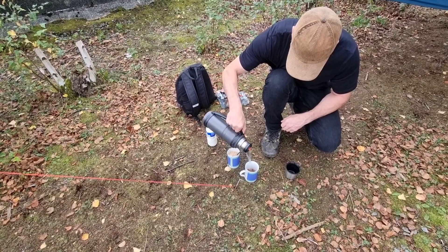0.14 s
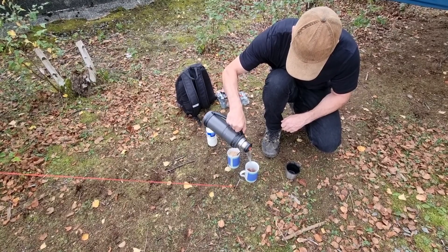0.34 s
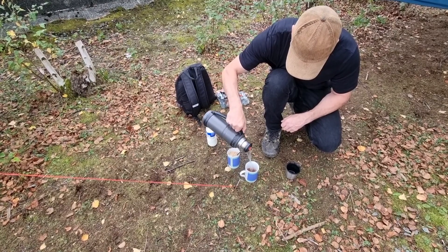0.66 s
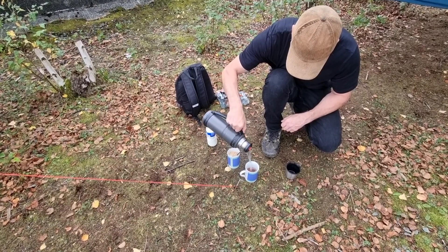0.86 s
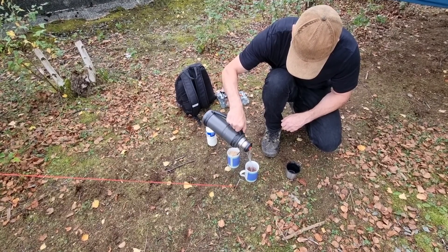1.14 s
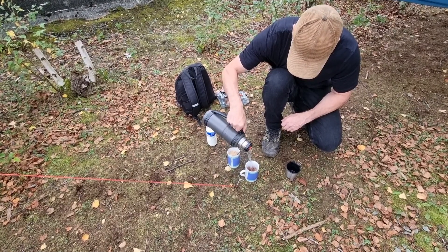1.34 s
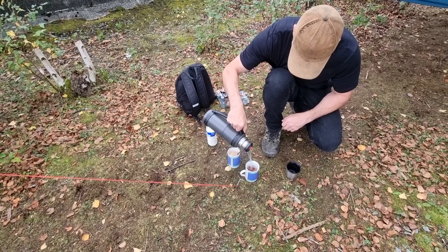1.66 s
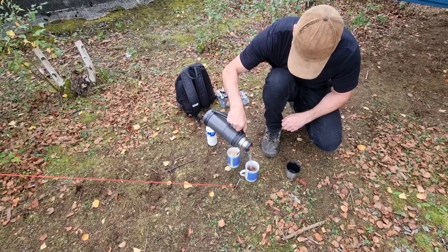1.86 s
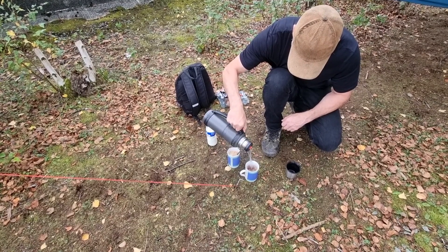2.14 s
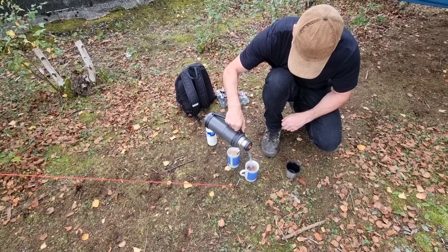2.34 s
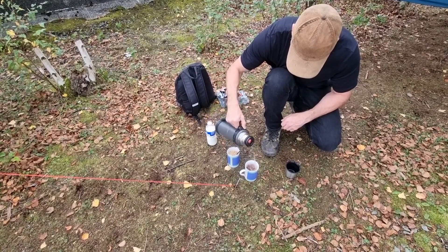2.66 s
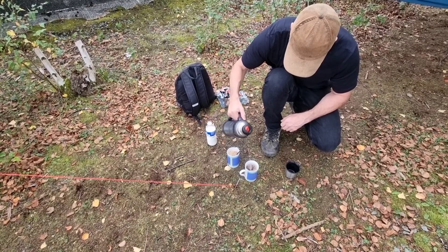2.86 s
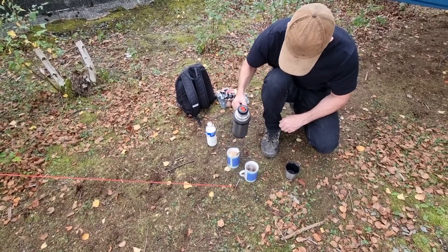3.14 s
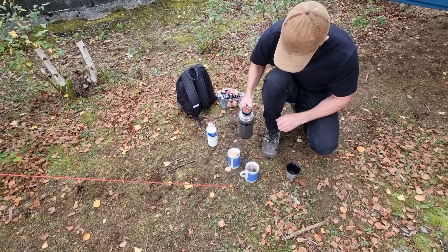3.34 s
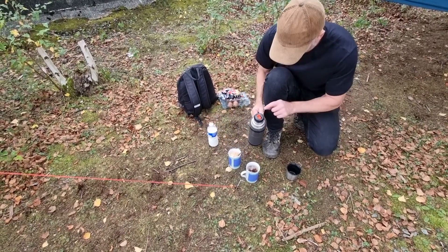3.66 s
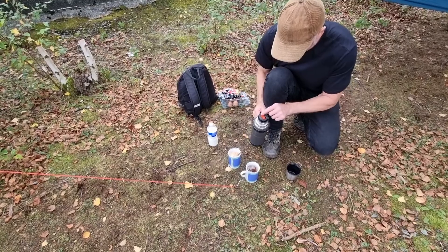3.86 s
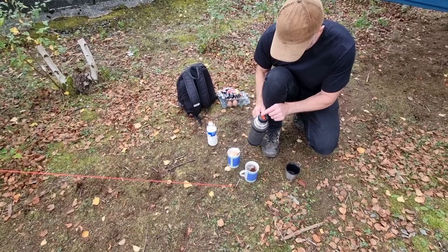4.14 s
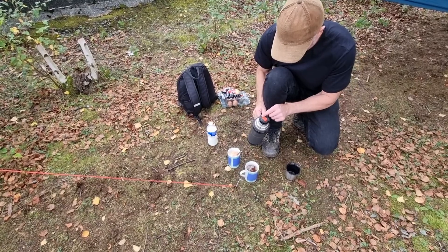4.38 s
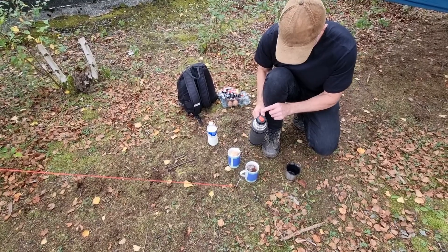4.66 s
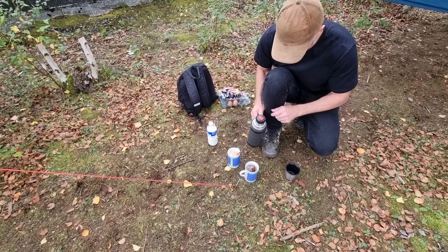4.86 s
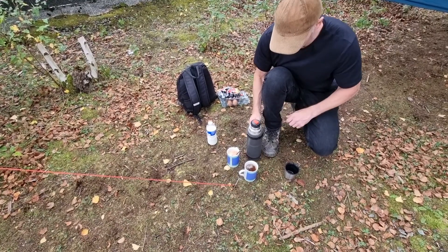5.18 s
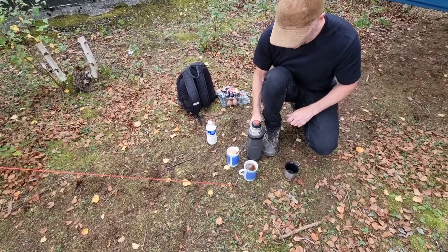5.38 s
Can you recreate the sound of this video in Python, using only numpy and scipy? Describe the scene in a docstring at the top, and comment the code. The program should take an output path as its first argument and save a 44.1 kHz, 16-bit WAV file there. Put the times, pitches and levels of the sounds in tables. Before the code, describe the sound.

Close and left of centre, a hot drink pours from a steel flask into a mug, bubbling and plopping, its hollow tone rising as the mug fills. Pouring thins to drips and ends at three seconds. After a quiet gap the stopper clicks shut, far louder than anything else, followed by small light ticks. Distant low rumble and wash continue outdoors.

```python
"""From the start a hot drink is poured from a steel flask into a mug outdoors: random splashes ring the mug's
air column, which rises in pitch as it fills, while bubbles pop as swelling tones and droplets tick; it ends at 3 s.
From 1.8 to 4.4 s the left treble is raised. One small handling tick comes at 3.66 s; at 4.3 s the stopper clicks
shut: noise cracks and a modal ring; the other ticks follow from 4.86 s. Throughout: distant noise bands (rumble,
wash, drone) and hiss; faint whistles now and then. The flask stands left of a close pair; sparse taps echo it all."""
import sys
import numpy as np
from scipy import signal
from scipy.fft import rfft, irfft
from scipy.io import wavfile
from scipy.ndimage import uniform_filter1d

SR = 44100
rng = np.random.default_rng(int(sys.argv[2]) if len(sys.argv) > 2 else 0)


def store_wav(level_fs):
    """Save 16-bit WAV to argv[1]."""
    pcm = np.round(np.clip(np.atleast_2d(level_fs), -1, 1) * 32767)
    wavfile.write(sys.argv[1], SR, pcm.T.astype(np.int16))


N = 243359

# popping bubbles, each with a small bright one; levels relative:
# t/s, level/dB, f/Hz, bright level/dB, bright f/Hz, kick to the second ring/dB
BUBBLES = [(0.0124, -39, 1116, -75, 2390, -72), (0.0272, -34.5, 1230, -64, 2850, -65),
           (0.0478, -34, 1170, -65, 2680, -62), (0.063, -32.5, 1120, -48.5, 3200, -68),
           (0.0872, -44, 1130, -49, 3260, -65), (0.132, -46, 1270, -52, 3040, -64),
           (0.163, -47, 1210, -58, 3180, -58), (0.1768, -34.5, 1247, -53, 3300, -60),
           (0.212, -44, 1175, -50, 2780, -59), (0.2258, -30, 1204, -45, 2950, -61),
           (0.281, -39.5, 1173, -51, 3270, -68), (0.294, -46, 1240, -45, 3220, -62),
           (0.3153, -42, 1180, -52, 3300, -61), (0.3523, -41.5, 1200, -78, 2690, -66),
           (0.382, -39.5, 1155, -74, 2620, -68), (0.406, -53, 1380, -44.5, 3270, -57),
           (0.4114, -29, 1227, -48, 2750, -56), (0.42, -31.5, 1370, -44, 3250, -56),
           (0.4408, -36.5, 1190, -63, 2300, -67), (0.4898, -33.5, 1190, -68, 2780, -67),
           (0.501, -59, 1260, -46, 3200, -63), (0.5227, -45, 1270, -54, 3250, -65),
           (0.5466, -41, 1170, -57, 3180, -63), (0.5835, -40, 1160, -63, 3050, -55),
           (0.6045, -30, 1270, -52.5, 3100, -52), (0.6112, -34, 1325, -45, 3030, -59),
           (0.6414, -35, 1270, -48.5, 3280, -58), (0.6935, -44, 1185, -80, 2840, -64),
           (0.7088, -28, 1267, -79, 2760, -66), (0.7512, -34.5, 1310, -63, 3350, -57),
           (0.817, -38.5, 1245, -53.5, 3120, -60), (0.84, -34.5, 1192, -58, 2900, -59),
           (0.8706, -34, 1295, -61, 2710, -60), (0.8968, -40.5, 1250, -75, 2740, -60),
           (0.9157, -39, 1315, -82, 2730, -58), (0.936, -45, 1300, -72, 2320, -53),
           (0.9652, -38, 1400, -71, 2880, -51), (0.998, -45, 1280, -79, 2900, -57),
           (1.011, -40.5, 1450, -62, 2830, -56), (1.0568, -40.5, 1390, -66, 3080, -57),
           (1.0873, -49, 1240, -64, 2900, -62), (1.1324, -30, 1220, -51, 2770, -51),
           (1.1441, -30.5, 1324, -57, 2760, -53), (1.1699, -40, 1400, -62, 2340, -58),
           (1.1827, -45, 1150, -52.5, 3170, -60), (1.2366, -40, 1510, -61, 2700, -58),
           (1.255, -52, 1110, -50, 2980, -55), (1.308, -44.5, 1310, -62, 2920, -52),
           (1.3353, -41, 1570, -49, 2200, -50), (1.3623, -39, 1420, -48.5, 3100, -51),
           (1.425, -40.5, 1320, -74, 2860, -55), (1.441, -46, 1330, -67, 2800, -50),
           (1.481, -42.5, 1310, -55, 2650, -51), (1.5126, -51, 1560, -55, 3250, -54),
           (1.5458, -49, 1750, -52, 2870, -55), (1.6033, -33.5, 1380, -72, 2360, -50),
           (1.6344, -38.5, 1280, -76, 2820, -47), (1.6531, -37, 1690, -70, 2340, -47),
           (1.6939, -41, 1370, -44, 2980, -54), (1.7285, -46, 1800, -55, 2680, -53),
           (1.7445, -44, 1160, -46.5, 2700, -53), (1.7913, -55, 1290, -54, 3070, -58),
           (1.831, -57, 1750, -54, 2700, -58), (1.914, -52, 1750, -63, 2740, -54),
           (1.9514, -51.5, 1670, -67, 2950, -57), (2.0188, -44.5, 1610, -59, 3040, -54),
           (2.0595, -50, 1730, -65, 2370, -56), (2.0824, -57, 1850, -57, 2710, -55),
           (2.0957, -49, 1790, -47, 2670, -56), (2.158, -52, 1190, -53, 2300, -56),
           (2.174, -49, 1770, -52, 2670, -53), (2.2034, -36.5, 1580, -53, 3070, -47),
           (2.2347, -41.5, 1336, -41, 2940, -53), (2.2662, -69, 1600, -57, 3060, -58),
           (2.284, -64, 1970, -53, 2860, -56), (2.4528, -49, 1670, -57, 2860, -57),
           (2.4776, -50.5, 1200, -58, 2730, -65), (2.5515, -48.5, 1270, -52, 3130, -45),
           (2.5659, -46, 1930, -45.5, 2840, -49), (2.6242, -39, 1700, -49.5, 3200, -46),
           (2.6598, -46.5, 1750, -53, 2930, -56), (2.698, -50, 1830, -52, 2870, -58),
           (2.7288, -53, 1220, -48, 2820, -57), (2.7608, -50.5, 1180, -55, 2600, -62),
           (2.8402, -55, 1160, -52.5, 2210, -58)]


def amp(db):
    """Decibels to gain."""
    return 10 ** (np.asarray(db) / 20)


def evened(x):
    """Scales to rms 1."""
    return x / np.sqrt(np.mean(x ** 2) + 1e-20)


def read(points, hz):
    """Interpolates a spectrum table on a log-frequency axis."""
    f, value = np.transpose(points)
    return np.interp(np.log(hz + 1), np.log(f + 1), value)


def curve(rows, t, axis):
    """Interpolates one column of a time table."""
    rows = np.array(rows)
    return np.interp(t, rows[:, 0], rows[:, axis])


def add(mix, s, sound):
    """Mixes a sound in at s seconds."""
    part = mix[round(s * SR):][:len(sound)]
    part += sound[:len(part)]


def resonate(x, hz, width):
    """One-pole resonance: shifts hz (may vary) down to zero, smooths, shifts back."""
    turn = np.exp(2j * np.pi * np.cumsum(hz * np.ones(len(x))) / SR)
    r = np.exp(-np.pi * width / SR)
    return 2 * (turn * signal.lfilter([1 - r], [1, -r], x / turn)).real


def twice(x, hz, width):
    """Two equal resonances in series, for steeper skirts; peak gain near 1."""
    return resonate(resonate(x, hz, width), hz, width)


def narrow(x, hz, width):
    """Steep resonance scaled to rms 1."""
    return evened(twice(x, hz, width))


def drift(seconds):
    """Slow random curve of rms 1: noise averaged twice."""
    n = round(seconds * SR)
    return evened(uniform_filter1d(uniform_filter1d(rng.standard_normal(N), n), n))


def colour(points):
    """Minimum-phase filter taps with the given dB spectrum."""
    hz = abs(np.fft.fftfreq(4096, 1 / SR))
    log_gain = np.log(amp(np.maximum(read(points, hz), -100)))
    return np.fft.ifft(np.exp(log_gain - 1j * signal.hilbert(log_gain).imag)).real[:2048]


def ping(db, hz, t60, glide, rise):
    """Decaying sine with a rounded start; glide raises its pitch."""
    t = np.arange(2600) / SR
    t60 = max(t60, .003)
    envelope = amp(db - 60 * t / t60) * (1 - np.exp(-t / rise)) ** 2
    return envelope * np.sin(2 * np.pi * hz * t * (1 + glide * t))


def bubble(db, hz, length, glide):
    """A few cycles that swell to db at length seconds and die, rising in pitch."""
    t = np.arange(1800) / SR
    u = t / max(length, .0004)
    swell = (u * np.exp(1 - u)) ** 1.4
    return amp(db) * swell * np.sin(2 * np.pi * hz * t * (1 + glide * t))


def noise(points, leaning, patchy_db):
    """Two-channel noise, rms 1, level drifting in patches over time and frequency."""
    # f/Hz, left-right likeness (1 = same)
    likeness = [(60, 0.82), (130, 1), (290, 0.58), (640, 0.13), (1410, -0.4), (3100, -0.19), (6820, 0.63),
                (15000, 1)]
    hz = np.fft.rfftfreq(2048, 1 / SR)
    a, b, c, d, patches = rng.standard_normal((N // 512 + 5, 1025, 5)).T
    patches = evened(uniform_filter1d(uniform_filter1d(patches, 12, 0), 8, 1))
    same = np.clip(read(likeness, hz), -1, 1)[:, None]
    left = a + 1j * b
    right = same * left + np.sqrt(1 - same ** 2) * (c + 1j * d)
    half_lean_db = read(leaning, hz)[:, None] / 2
    shape_db = read(points, hz)[:, None] + patchy_db * patches
    z = np.array([left, right]) * amp(shape_db + np.array([half_lean_db, -half_lean_db]))
    return evened(signal.istft(z, nperseg=2048, noverlap=1536)[1][:, :N])


def outdoors():
    """Distant rumble, wash and fuzzy drone, plus hiss: shaped noise under level curves."""
    # distant sounds: t/s, wash level/dB, drone level/dB
    far = [(0, -52.5, -67), (.75, -53.5, -61.5), (1.49, -53, -53), (2.2, -56, -60.5), (2.6, -55, -85),
           (3.6, -54.5, -80), (4.0, -54, -52), (4.3, -53, -69), (4.6, -50, -59.5), (5.04, -51, -46),
           (5.52, -51, -55)]
    # noise spectra: f/Hz, relative density/dB per Hz
    rumble_shape = [(12, -60.5), (20, -36.5), (30, -38), (59, 9), (82, 2), (113, -11.5), (200, -15),
                    (260, -39), (440, -120)]
    wash_shape = [(59, -49.5), (100, -3), (298, -5), (367, -9), (505, -9), (1070, -17.5), (1320, -18),
                  (1480, -23.5), (1780, -25.5), (3580, -38), (9000, -64), (11700, -100.5), (19800, -120)]
    # microphone hiss: f/Hz, relative density/dB per Hz
    hiss_shape = [(4120, -25.5), (7000, -10.5), (7480, -19), (10600, -1.5), (11800, 1), (13800, 7.5),
                  (16000, -9)]
    # far sounds: f/Hz, left minus right/dB
    far_lean = [(60, -2), (180, 0), (550, 1.5), (1650, 1.5), (4970, 12), (15000, -11)]
    # hiss: f/Hz, left minus right/dB
    hiss_lean = [(60, 0.5), (130, -0.5), (290, 0), (640, -1), (1410, 7), (3100, 5), (6820, 6.5),
                 (15000, -7.5)]
    start_db, fade_db_per_s, swell_db, hiss_db = -48, 0.54, -4, -87
    drone_hz, drone_width_hz = 293, 130
    t = np.arange(N) / SR
    rumble_db = start_db - fade_db_per_s * t + swell_db * drift(0.037)
    rumble = amp(rumble_db) * noise(rumble_shape, far_lean, patchy_db=0)
    wash = amp(curve(far, t, axis=1)) * noise(wash_shape, far_lean, patchy_db=1.5)
    drone = amp(curve(far, t, axis=2)) * narrow(rng.standard_normal(N), drone_hz, drone_width_hz)
    return rumble + wash + drone + amp(hiss_db) * noise(hiss_shape, hiss_lean, patchy_db=0)


def whistles():
    """Faint whistles: narrow noise bands faded in and out."""
    # start/s, end/s, f/Hz, width/Hz, level/dB
    whistle_rows = [(0.93, 1.2, 543, 13, -60.5), (3.74, 4.29, 1734, 81, -70), (4.4, 4.442, 2240, 21, -70),
                    (4.831, 4.869, 3670, 300, -68.5), (5.285, 5.335, 5010, 370, -76.5),
                    (5.325, 5.603, 2820, 250, -71)]
    out = np.zeros(N)
    for start, end, hz, width, db in whistle_rows:
        n = round((end - start) * SR)
        tone = narrow(rng.standard_normal(N // 6), hz, width)[-n:]
        add(out, start, amp(db) * tone * signal.windows.tukey(n, .5))
    return out


def handling_ticks():
    """Small knocks: a ping plus decaying noise in narrow bands."""
    # t/s, level/dB, f/Hz, then relative to level: middle knock/dB, low knock/dB, thin treble/dB
    tick_rows = [(3.6572, -69.5, 4580, -10, -6, 1.5), (4.8584, -59, 2900, -18, 3, -22),
                 (4.8679, -60, 3420, 6, 11, -14), (4.893, -58.5, 2760, -5, -4, -22),
                 (4.933, -65, 3900, -10, 7.5, -20), (4.9507, -43.5, 3960, 2, -8, -22),
                 (4.9626, -62.5, 4200, 1, 18, -18), (4.9924, -48.5, 3550, 11.5, 0.5, -28),
                 (5.025, -74, 4190, -8, -8, -7.5), (5.301, -44.5, 3330, -29, -20, -32),
                 (5.3038, -48.5, 2970, -23, -18, -33), (5.317, -62, 2820, -4, 3, -20)]
    tick_t60_s = 0.043
    out = np.zeros(N)
    t = np.arange(900) / SR
    for s, db, hz, middle_db, low_db, thin_db in tick_rows:
        crack = rng.standard_normal(900) * amp(-60 * t / 0.02) * (1 - np.exp(-t / 0.00016))
        crack = narrow(crack, 1930, 1700) / 3  # soft plastic has little treble
        thin = rng.standard_normal(130) * np.hanning(130)
        add(out, s, ping(db + 2.0, hz, tick_t60_s, glide=0, rise=0.00032))
        add(out, s, amp(db - 18.5) * narrow(crack, hz, 790))
        add(out, s, amp(db + thin_db) * narrow(thin, 4200, 3700))
        add(out, s, amp(db + middle_db - 12.5) * narrow(crack, 2460, 604))
        add(out, s, amp(db + low_db + 2.5) * narrow(crack, 1150, 450))
    return out


def stopper():
    """Each blow is a shaped noise crack plus the decaying modes of stopper and flask."""
    # modes of stopper and steel body: f/Hz, relative level/dB, t60/s
    modes = [(376, -25.5, 0.052), (529, -12, .022), (694, -1, 0.013), (1184, -7.5, 0.02),
             (1248, -1.5, 0.022), (913, -18, .145), (4470, -19, .02), (1613, -27.5, .018),
             (2408, -11.5, .02), (2975, -15.5, 0.019), (5670, -28, 0.013), (6050, -27, 0.01185)]
    # crack spectrum: f/Hz, relative level/dB
    crack_shape = [(300, -36), (1300, 11.5), (3000, 1), (6500, -10.5), (7800, -23), (12000, -21),
                   (15500, -16.5)]
    # blows as it snaps shut, the last an echo: t/s, crack peak/dB, ring peak/dB (before panning)
    blows = [(4.2945, -28.5, -43.5), (4.2966, -33.5, -3), (4.2978, -11.5, -29), (4.318, -47.5, -28.5)]
    t = np.arange(12000) / SR
    ring = sum(amp(db - 60 * t / t60) * np.sin(2 * np.pi * hz * t) for hz, db, t60 in modes)
    ring *= 1 - np.exp(-t / 0.00081)
    out = np.zeros(N)
    for s, crack_db, ring_db in blows:
        rattle = rng.standard_normal(500) * amp(-60 * t[:500] / 0.017)
        crack = np.convolve(rattle, colour(crack_shape))
        add(out, s, amp(crack_db) * crack / abs(crack).max())
        add(out, s, -amp(ring_db) * ring / abs(ring).max())
    return out


def droplets():
    """Droplets tick on the surface: a thin noise crack and a ping of rising pitch."""
    # t/s, relative level/dB, f/Hz at onset, t60/s
    droplet_rows = [(0.1421, -51, 12400, 0.01), (0.1815, -64, 12900, 0.007), (0.2249, -64, 4350, 0.007),
                    (0.2603, -62, 13300, 0.007), (0.4055, -65, 4000, 0.007), (0.418, -49, 4060, 0.007),
                    (0.5651, -62, 12100, 0.007), (0.618, -52, 4000, 0.007), (0.7083, -58, 13500, 0.007),
                    (0.7507, -50.5, 12300, 0.007), (0.9707, -52, 13400, 0.007), (1.256, -49, 13200, 0.007),
                    (1.3573, -61, 12500, 0.007), (1.4815, -49, 4110, 0.0062), (1.508, -67, 13200, 0.007),
                    (1.5439, -57, 6200, 0.0086), (1.563, -47, 13600, 0.007), (1.709, -62, 14200, 0.007),
                    (1.7656, -51, 4040, 0.0063), (1.8029, -36.5, 6600, 0.0043), (1.8308, -51, 6640, 0.0088),
                    (1.8556, -49, 6040, 0.013), (1.9008, -48.5, 6360, 0.005), (1.952, -58, 6500, 0.0062),
                    (2.0443, -63, 6030, 0.007), (2.0597, -61, 6160, 0.007), (2.082, -57, 5930, 0.0076),
                    (2.1906, -49.5, 6200, 0.006), (2.2348, -66, 6500, 0.007), (2.2648, -68, 6820, 0.007),
                    (2.4389, -62, 5050, 0.007), (2.4698, -59, 4900, 0.007), (2.4954, -56, 6850, 0.005),
                    (2.5336, -55, 5000, 0.007), (2.5526, -56, 4900, 0.007), (2.589, -51.5, 6200, 0.0032),
                    (2.6224, -53.5, 5340, 0.0076), (2.6535, -55, 5970, 0.0095), (2.6986, -59, 5910, 0.0082),
                    (2.7515, -53, 4940, 0.01), (2.7985, -54, 4750, 0.021), (2.8395, -65, 6300, 0.007),
                    (2.8654, -53, 4350, 0.021), (2.8978, -44.5, 4860, 0.0093),
                    (2.9306, -53.5, 6340, 0.0065), (2.9557, -57, 4890, 0.007)]
    crack_db = -15.5
    out = np.zeros(N)
    for s, db, hz, t60 in droplet_rows:
        thin = np.diff(rng.standard_normal(101)) * np.hanning(100) ** 2
        add(out, s, amp(db + crack_db) * thin)
        add(out, s, ping(db - 6.5, hz, t60, glide=3.7, rise=0.00017))
    return out


def popping_bubbles():
    """Each loud bubble is a swelling tone of rising pitch with a small bright one beside it."""
    # cycles to the peak, at the onset pitch
    peak_cycles, cycles_spread, bright_peak_cycles = 3.02, 0.16, 2.9
    out = np.zeros(N)
    cycles = peak_cycles * np.exp(cycles_spread * rng.uniform(-0.81, 1, len(BUBBLES)))
    for (s, db, hz, bright_db, bright_hz, _), n in zip(BUBBLES, cycles):
        add(out, s - .001, bubble(db + 6.5, hz, n / hz, glide=1.2))
        add(out, s - .0003, bubble(bright_db - 0.5, bright_hz, bright_peak_cycles / bright_hz, glide=1.9))
    return out


def small_bubbles(low_db, high_db):
    """Bubbles of sixteen sizes pop at random; low and high ones follow their own level."""
    total_per_s, low_hz, high_hz = 130, 1076, 2093
    out = np.zeros(N)
    for share in np.linspace(0, 1, 16):
        hz = low_hz * (high_hz / low_hz) ** share
        toward_high = np.clip(1.8 * share - 0.8, 0, 1)
        sizes = amp(6.2 * np.minimum(rng.exponential(1, N), 3))
        sizes *= rng.random(N) < total_per_s / 16 / SR
        level_db = low_db + toward_high * (high_db - low_db)
        out += signal.oaconvolve(sizes * amp(level_db), bubble(0, hz, 3.0 / hz, glide=7.1))[:N]
    return out


def stream():
    """Clumped random splashes excite the mug's air column and upper rings; fine spray on top."""
    # relative levels: t/s, air column/dB, second ring/dB, upper colour/dB, fine spray/dB
    pour = [(0, -50.5, -54, -57, -82), (.5, -57, -45.5, -59.5, -85.5), (.8, -52.5, -45.5, -58.5, -83),
            (1.05, -63.5, -40.5, -61.5, -87), (1.5, -63.5, -38, -62, -82.5), (2.0, -66, -39.5, -58, -83),
            (2.25, -61.5, -35, -67, -86), (2.4, -78, -48, -60.5, -89), (2.75, -73, -41, -65, -90),
            (3.0, -69, -54, -55, -91)]
    # upper colour of the splashes: f/Hz, width/Hz, relative level/dB
    splash_bands = [(2810, 710, 4), (3790, 134, -2.5), (5830, 830, -56)]
    # second ring of the mug: mean f/Hz, width/Hz
    second_ring = (1797, 340)
    column_hz, rise_hz_per_s, nearly_full_s = 1191, 68, 1.45
    pour_end_s, fade_s, gush_s, gush_power = 3.0, 0.11, 0.01, 0.27
    t = np.arange(N) / SR
    flow_db, second_db, upper_db, spray_db = (curve(pour, t, axis=k) for k in range(1, 5))
    column = column_hz + rise_hz_per_s * np.minimum(t, nearly_full_s)
    sizes = amp(3.5 * np.minimum(rng.exponential(1, (3, N)), 4)) * rng.choice([-1, 1], (3, N))
    hits_per_s = np.array([[700], [300], [3000]])  # column, second ring, spray
    hits = sizes * (rng.random((3, N)) < hits_per_s / SR)

    # random clumping; the flow gushes around each loud bubble
    clumps = amp(3 * evened(uniform_filter1d(rng.standard_normal(N), 500)))
    popped = np.zeros(N)
    popped[[round(row[0] * SR) for row in BUBBLES]] = amp([row[1] for row in BUBBLES])
    gush = signal.oaconvolve(popped, np.hanning(round(2 * gush_s * SR)), "same")
    gush_ratio = abs(gush) / (uniform_filter1d(gush, SR // 3) + 1e-6)
    clumps = clumps * (0.67 + gush_ratio) ** gush_power

    wander = 1 + 0.008 * evened(uniform_filter1d(rng.standard_normal(N), 500))  # pitch wobble
    body = amp(flow_db) * narrow(hits[0] * clumps, column * wander, 220)
    spray = amp(spray_db) * narrow(hits[2] * clumps, 13170, 2700)

    # each loud bubble kicks the second ring and leaves a fading fizz
    kicks, fizz, after = np.zeros(N), np.zeros(N), np.arange(1500) / SR
    for s, _, _, bright_db, _, kick_db in BUBBLES:
        add(kicks, s, amp(kick_db + 19.5) * rng.choice([-1, 1]) * np.hanning(12))
        add(fizz, s, amp(bright_db - 60 * after / 0.096) * rng.standard_normal(1500))
    splashes = evened((hits[1] + .3 * hits[0]) * clumps ** 1.1)
    second = twice(amp(second_db) * splashes + kicks, second_ring[0] * wander, second_ring[1])
    small = small_bubbles(flow_db + 2.5, second_db - 25)
    upper_drive = amp(upper_db) * splashes + amp(-2.0) * fizz
    upper = sum(amp(db) * twice(upper_drive, hz, width) for hz, width, db in splash_bands)
    fade_out = np.clip((pour_end_s - t) / fade_s, 0, 1)
    return fade_out * (body + second + upper + spray + small)


def yard(x):
    """Echoes: sparse taps of random sign, each band with its own level and decay."""
    # f/Hz, relative level/dB, t60/s (clipped to 0.03-0.4 s below)
    echo_bands = [(300, -30, 0.067), (1000, -14.5, 0.18), (2510, -14.5, 0.11), (4680, -12, 0.21),
                  (6500, -9.5, 0.2), (9000, -13.5, 0.66), (14000, -16, .16)]
    taps = np.zeros((2, 12000))
    at = np.arange(200, 11960, 20) + rng.integers(0, 20, (2, 588))
    np.put_along_axis(taps, at, rng.choice([-1., 1.], at.shape), 1)
    hz, t, z = signal.stft(taps, SR, nperseg=128)
    level_db, t60 = (read(np.array(echo_bands)[:, [0, k]], hz)[:, None] for k in (1, 2))
    decay = amp(-60 * t / np.clip(t60, .03, .4))
    decay /= np.sqrt(20 * (decay ** 2).sum(1, keepdims=True) / 6)  # level independent of t60
    tail = signal.istft(z * decay * amp(level_db), SR, nperseg=128)[1]
    return signal.fftconvolve(x[None], tail, axes=1)[:, :N]


def at_left(x, leaning, lag_s):
    """A close source at the left: level difference per frequency, later on the right."""
    hz = np.fft.rfftfreq(N, 1 / SR)
    right_ratio, z = amp(-read(leaning, hz)), rfft(x)
    left = z * 2 / (1 + right_ratio)
    right = left * right_ratio * np.exp(-2j * np.pi * hz * lag_s)
    return irfft(np.array([left, right]), N)


def scene():
    """Mug and flask close by with their echoes, over the distant sounds."""
    # mug: f/Hz, left minus right/dB
    mug_lean = [(300, 0), (950, 4), (1500, 6), (3100, 7.5), (6000, 9), (15000, 6)]
    # stopper: f/Hz, left minus right/dB
    stopper_lean = [(200, 1), (500, 8.5), (1000, 9.5), (2200, 7), (4200, 19), (8000, 15), (14000, 14)]
    # microphone housing dulls one band of the close sounds: f/Hz, gain/dB
    housing = [(7000, -1), (7900, -2), (10000, 0.5), (11800, 0.5)]
    small = stream() + popping_bubbles() + droplets() + handling_ticks() + whistles()
    click = stopper()
    near = at_left(small, mug_lean, lag_s=0.00033) + at_left(click, stopper_lean, lag_s=.0001)
    close = near + yard(click + amp(2.5) * small)
    housing_gain = amp(read(housing, np.fft.rfftfreq(N, 1 / SR)))
    return irfft(rfft(close) * housing_gain, N) + outdoors()


def record(dry):
    """The left treble lifts for a while; overload clips; then the band limit."""
    # left treble: t/s, gain/dB (times the share)
    lift = [(0, -1.5), (1.79, -3), (1.805, 15), (3, 19), (4.37, 12), (4.4, -6.5), (5.52, -1.5)]
    # f/Hz, share of the gain
    lift_band = [(2500, 0), (3800, 0.25), (5000, 0.57), (7000, 1.01), (7600, 0.56), (11000, 0.15),
                 (12500, 0)]
    edge_hz = 16150
    hz, t, z = signal.stft(dry[0], SR, nperseg=512)
    lift_db = read(lift_band, hz)[:, None] * curve(lift, t, axis=1)
    left = signal.istft(z * amp(lift_db), SR, nperseg=512)[1][:N]
    both = np.clip([left, dry[1]], -1, 1)
    low_pass = signal.firwin(511, edge_hz, window=("kaiser", 9), fs=SR)
    return signal.oaconvolve(both, low_pass[None], "same")


dry = scene()
out = record(dry)
store_wav(out)
```